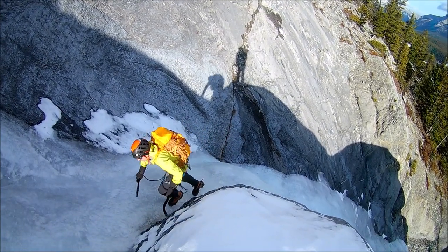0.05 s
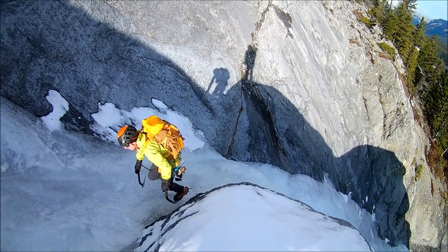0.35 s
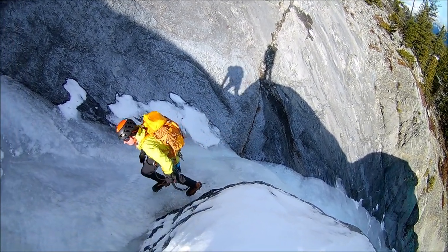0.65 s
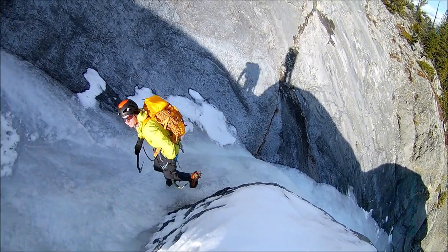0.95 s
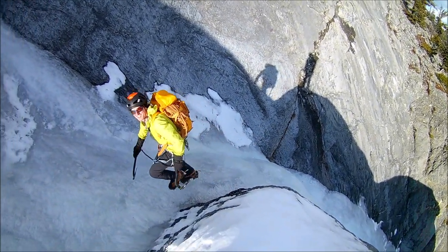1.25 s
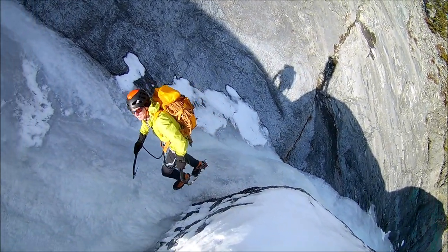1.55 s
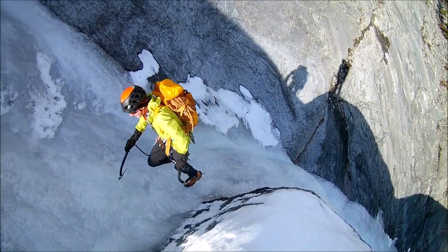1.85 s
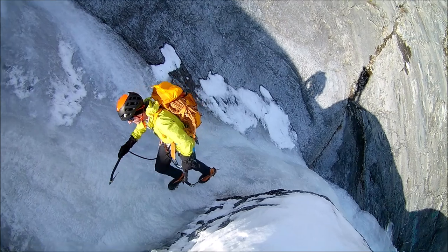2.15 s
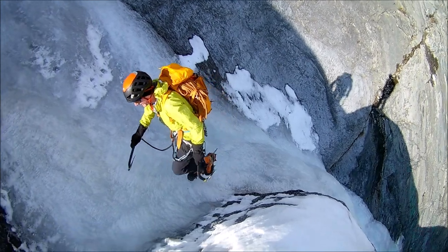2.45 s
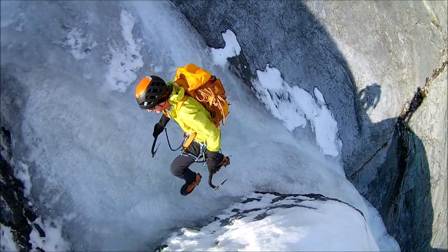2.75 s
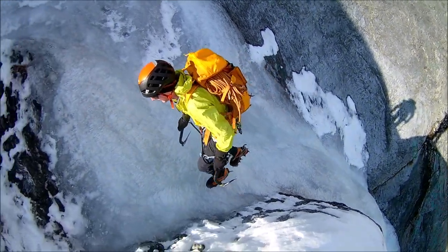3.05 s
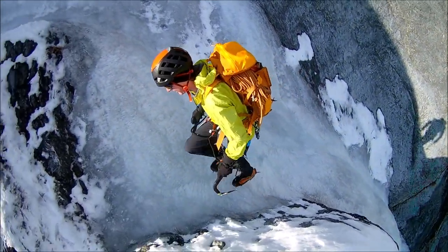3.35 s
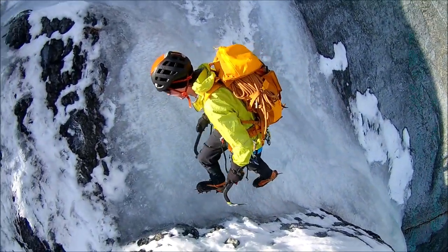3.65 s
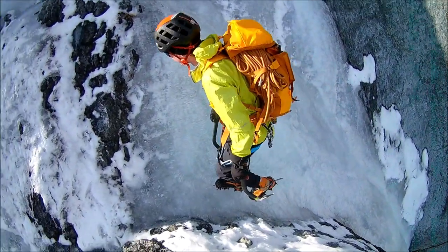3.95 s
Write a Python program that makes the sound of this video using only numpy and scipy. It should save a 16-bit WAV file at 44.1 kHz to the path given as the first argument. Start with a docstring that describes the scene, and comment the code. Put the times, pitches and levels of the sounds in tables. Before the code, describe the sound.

Steel bites into hard ice six times, with light gear clinks, wind and a low hum.

```python
"""Steel bites into hard ice: a few metres away, a climber's tool and crampon points crush in and thud.
Between the blows the steel knocks, gear ticks and clinks, and ice crumbs trickle away.
The crunch is a run of tiny random fractures; the steel is two damped modes jostled by the breaking ice.
Wind rumbles under it all, with a low, beating machine hum and its thin whine."""
import sys
import numpy as np
from scipy import signal
from scipy.fft import rfft, irfft, next_fast_len
from scipy.io import wavfile
from scipy.ndimage import map_coordinates

SR = 44100
rng = np.random.default_rng(int(sys.argv[2]) if len(sys.argv) > 2 else 0)


def persist_wave(psi):
    """Save psi, clipped to +-1, as 16-bit WAV."""
    counts = np.round(np.clip(psi, -1, 1) * 32767).astype(np.int16)
    wavfile.write(sys.argv[1], SR, np.atleast_2d(counts).T)


N = 176400

ATTACK_S, FRACTURES_PER_S = 0.0014, 3000
# The colour of crushing ice. Each row: frequency in Hz, gain in dB.
CRUNCH_COLOUR = [(60, -9.5), (170, 3.5), (400, 4.5), (600, -0.5), (800, 1.5), (1550, 0.5), (1950, -17.5),
                 (2550, -18.5), (3400, -24.5), (7200, -36), (7900, -59), (8900, -38), (11000, -52),
                 (14000, -67)]
# The treble roll-off of the ringing steel. Each row: frequency in Hz, gain in dB.
STEEL_TREBLE = [(1600, 0.5), (1800, -11.5), (2050, -4), (4000, -23.5)]
# The treble roll-off of ticks and clinks. Each row: frequency in Hz, gain in dB.
TICK_TREBLE = [(6800, -1.5), (7900, -25), (9500, -4), (13000, -32)]


def amp(db):
    """Decibels to gain."""
    return 10 ** (np.asarray(db) / 20)


def unit(x):
    """Scale to rms 1."""
    return x / np.sqrt(np.mean(x ** 2) + 1e-20)


def clock():
    """Time of each sample."""
    return np.arange(N) / SR


def level(rows):
    """Gain per sample from (s, dB) points."""
    return amp(np.interp(clock(), *np.transpose(rows)))


def wobble(rate):
    """A smooth random curve, rate knots a second."""
    return map_coordinates(rng.standard_normal(int(N * rate / SR) + 4), [clock() * rate])


def colour(x, points):
    """Minimum-phase EQ through points of frequency in Hz and gain in dB."""
    size = 2 * next_fast_len(len(x))
    hz, db = np.transpose(points)
    curve_db = np.interp(np.log(np.fft.rfftfreq(size, 1 / SR) + 1), np.log(hz), db)
    cepstrum = irfft(np.log(amp(curve_db)))
    cepstrum[1:size // 2] *= 2  # folded, so nothing rings ahead of a hit
    cepstrum[size // 2 + 1:] = 0
    return irfft(rfft(x, size) * np.exp(rfft(cepstrum)), size)[:len(x)]


def envelope(t, attack, hold, t60):
    """Rise over attack, stay up until hold, then fall 60 dB every t60; all in seconds."""
    return np.clip(t / attack, 0, 1) * amp(-60 * np.maximum(t - hold, 0) / t60)


def add(track, s, sound):
    """Mix a sound in at time s."""
    i = round(s * SR)
    part = sound[max(-i, 0):N - i]
    track[max(i, 0):][:len(part)] += part


def fractures(size):
    """Random tiny snaps of uneven strength."""
    return unit(rng.standard_normal(size) * (rng.random(size) < FRACTURES_PER_S / SR))


def burst(shape, points):
    """A run of fractures under an envelope, ringing with a colour."""
    snaps = fractures(len(shape))
    return colour(snaps * shape, points) / np.std(colour(snaps, points))


def ring(t, hz, rough, jostle_cycles=0.65):
    """A resonance whose phase is jostled every cycle or so, as by breaking ice."""
    drift = np.cumsum(rng.standard_normal(len(t) // 3)) * np.sqrt(jostle_cycles)
    jostle = map_coordinates(drift, [t * hz / jostle_cycles])
    return np.sin(2 * np.pi * hz * t + rough * jostle)


def steel(t, hz):
    """A steel point held in ice: its main mode and a quieter, lower one."""
    return ring(t, hz, rough=0.5) + amp(-8) * ring(t, 0.674 * hz, rough=0.5)


def strikes():
    """The point bites, the ice cracks hollow, the steel crushes in ringing and stops with a thud."""
    # Blows into the ice. Each row: start in seconds, crunch in dB, crushing time in seconds, bite in dB,
    # thud pitch in Hz, thud in dB, lower thud in dB, ring pitch in Hz, ring in dB, hollow crack in dB.
    blows = [(0.0, -31.5, 0.0067, -52, 284, -32.5, -33, 1370, -32, -53),
             (0.6535, -31, 0.0055, -52.5, 735, -21.5, -49, 1445, -30.5, -40),
             (1.379, -37.5, 0.015, -45.5, 764, -36, -32, 1527, -38, -40),
             (2.072, -32.5, 0.011, -43.5, 195, -24.5, -29, 1286, -35.5, -46),
             (2.7642, -26, 0.009, -44.5, 325, -18.5, -26, 1530, -28, -43),
             (3.549, -24, 0.0088, -38, 356, -26, -23, 1464, -14.5, -30.5)]
    # The bright chipping of the surface. Each row: frequency in Hz, gain in dB.
    bite_colour = [(300, -62), (1500, 15), (2000, 4.5), (2500, 13), (3300, 2), (4050, 4), (4900, -2.5),
                   (6000, -0.5), (7300, -10.5), (7900, -23), (9000, -10), (11500, -19), (14000, -35)]
    # The hollow crack of the ice. Each row: frequency in Hz, gain in dB.
    hollow_colour = [(1700, -27), (2100, -8.5), (2400, 2.5), (2600, -0.5), (2900, 0.5), (3350, -19),
                     (4050, -11), (4900, -25.5), (5950, -14.5), (6500, -26.5), (9000, -59.5)]
    ice, metal, t = np.zeros(N), np.zeros(N), np.arange(SR // 6) / SR
    for s, db, crush_s, bite_db, thud_hz, thud_db, low_db, ring_hz, ring_db, hollow_db in blows:
        rise = crush_s / 2
        thud = amp(thud_db) * ring(t, thud_hz, rough=0.3)
        thud += amp(low_db) * ring(t, 0.48 * thud_hz, rough=0.3)
        bite = burst(envelope(t, attack=0.0063, hold=0.017, t60=0.043), bite_colour)
        crack = burst(envelope(t, ATTACK_S, hold=0.004, t60=0.036), hollow_colour)
        crunch = burst(envelope(t, rise, crush_s, t60=0.047), CRUNCH_COLOUR)
        add(ice, s - 0.0073, amp(bite_db) * bite)  # the point chips the surface before it sinks in
        add(ice, s - 0.001478, amp(hollow_db) * crack)
        add(ice, s, amp(db) * crunch)
        add(ice, s + 0.0025, envelope(t, rise, rise, t60=0.04) * thud)  # the point stops
        add(metal, s, amp(ring_db) * envelope(t, rise, crush_s, t60=0.02) * steel(t, ring_hz))
    return ice + colour(metal, STEEL_TREBLE)


def wall(x):
    """Rock and ice scatter the sound back as a short, diffuse tail."""
    t = np.arange(SR // 2) / SR
    tail = rng.standard_normal(len(t)) * envelope(t, attack=0.021, hold=0.029, t60=0.44)
    return signal.fftconvolve(x, tail / np.linalg.norm(tail))[:N]


def wind(buffet_width_s=0.028):
    """A dull rush of air, a gusty rumble and a few deep buffets."""
    # The colours of the three layers of air. Each row: frequency in Hz, gain in dB.
    rush_colour = [(100, -15), (170, -1), (239, -5.5), (405, -6), (548, -11.5), (815, -13.5), (896, -16),
                   (1000, -7.5), (1140, -18), (1700, -25), (2390, -41.5), (5090, -49.5), (7850, -55.5),
                   (15500, -55)]
    rumble_colour = [(12, -8.5), (28, 17.5), (50, -5.5), (85, 16), (150, 16.5), (200, 1), (400, -56.5)]
    buffet_colour = [(12, -21), (30, 5), (55, 0.5), (90, 4), (170, -8), (400, -17.5), (900, -97)]
    # The slow swells of rush and rumble. Each row: time in seconds, level in dB.
    rush_ride = [(0.0, -42), (0.28, -44.5), (1.0, -44.5), (1.87, -44.5), (2.71, -43.5), (4.0, -44.5)]
    rumble_ride = [(0, -48), (1.5, -42.5), (2.4, -46.5), (2.7, -37.5), (3.0, -45.5), (4, -39.5)]
    # Gusts hitting the microphone. Each row: peak time in seconds, level in dB.
    buffets = [(2.62, -40), (2.68, -36), (2.789, -31.5), (2.849, -41.5)]
    rush = unit(colour(rng.standard_normal(N), rush_colour))
    rush *= level(rush_ride) * amp(0.67 * wobble(10.0))
    rumble = unit(colour(rng.standard_normal(N), rumble_colour))
    rumble *= level(rumble_ride) * amp(3.4 * wobble(6.04))
    gusts = sum(amp(db) * np.exp(-((clock() - s) / buffet_width_s) ** 2) for s, db in buffets)
    return rush + rumble + gusts * unit(colour(rng.standard_normal(N), buffet_colour))


def hum(turn_hz=25.35, drift=0.0031, sway_db=1.6, sway_rad=0.3):
    """Low harmonics of a turning machine beat once a turn; two fuzzy lines whine above."""
    # The machine's harmonics. Each row: multiple of the turning rate, level in dB before the ride.
    hum_harmonics = [(2, -47), (3, -40.5), (4, -38.5), (5, -36.5)]
    # The fader ride on those harmonics. Each row: time in seconds, gain in dB.
    hum_ride = [(0, -8.5), (.5, -8.5), (.85, -3.5), (2.3, -3), (3.3, -1), (4, -2)]
    # The narrow bands of the whine. Each row: centre in Hz, width in Hz, level in dB.
    whine_bands = [(507, 5.8, -58), (1019, 24, -56)]
    low, whine, t = np.zeros(N), np.zeros(N), clock()
    turn = 2 * np.pi * np.cumsum(turn_hz * (1 + drift * wobble(3.27))) / SR
    for multiple, db in hum_harmonics:
        gain = amp(db + sway_db * wobble(4.106))
        low += gain * np.cos(multiple * turn + rng.normal(0, 0.94) + sway_rad * wobble(4.65))
    for hz, width, db in whine_bands:
        fuzz = wobble(width) + 1j * wobble(width)  # wanders in both level and phase
        whine += amp(db) * unit(np.real(fuzz * np.exp(2j * np.pi * hz * t)))
    return np.sqrt(2) * low * level(hum_ride) + whine


def crumbs(grains_per_s=320, grain_s=0.004):
    """Loose grains of ice rustle down the slope, each a tiny scrape."""
    # The ebb and flow of the trickle. Each row: time in seconds, level in dB.
    trickle_ride = [(0, -77), (.2, -83), (.6, -93), (.76, -77), (1.0, -85.5), (2.0, -80.5), (2.15, -75),
                    (2.7, -89), (2.85, -72.5), (3.3, -74), (3.65, -70), (4, -77)]
    # The crisp colour of the grains. Each row: frequency in Hz, gain in dB.
    grain_colour = [(500, -14), (1500, -3.5), (2200, 9), (4000, 5.5), (6600, -1), (7900, -16.5), (9500, -7),
                    (13000, -34)]
    t = np.arange(SR // 20) / SR
    landings = rng.exponential(size=N) * (rng.random(N) < grains_per_s / SR)
    decays = signal.fftconvolve(landings, np.exp(-2 * t / grain_s))[:N]
    return level(trickle_ride) * unit(colour(decays * rng.standard_normal(N), grain_colour))


def knocks(scuff_below_db=-28.5):
    """Light contacts: a snap, a short crunch and a damped ring; gentler ones scuff instead of snapping."""
    # Steel touching ice. Each row: start in seconds, ring in dB, ring pitch in Hz, crunch in dB.
    contacts = [(0.047, -32.5, 1384, -32.5), (0.103, -41, 1507, -40.5), (0.895, -42.5, 1470, -58),
                (2.107, -40, 1450, -35), (2.3476, -31, 1710, -31), (2.3732, -29, 1704, -32.5),
                (2.779, -34, 1040, -43), (2.825, -36.5, 1494, -36.5), (2.932, -33, 1367, -39),
                (3.5751, -26.5, 1616, -24), (3.604, -34.5, 1580, -33.5), (3.782, -42.5, 1467, -41),
                (3.793, -37.5, 1466, -41), (3.87, -43, 1450, -41.5)]
    # The treble roll-off of snap and crunch. Each row: frequency in Hz, gain in dB.
    ice_treble = [(3000, -1), (10000, -11)]
    ice, metal, t = np.zeros(N), np.zeros(N), np.arange(SR // 8) / SR
    snap = colour(signal.unit_impulse(len(t)), CRUNCH_COLOUR)
    snap = amp(1.5) * snap / np.abs(snap).max()
    for s, ring_db, hz, crunch_db in contacts:
        softness = np.clip(amp(1.4 * (scuff_below_db - crunch_db)), 1, 5.8)
        rise = softness * ATTACK_S / 2
        crunch = burst(envelope(t, rise, rise, t60=0.032), CRUNCH_COLOUR)
        add(ice, s, amp(crunch_db) * (snap / softness + crunch))
        add(metal, s, amp(ring_db) * envelope(t, rise, rise, t60=0.038) * steel(t, hz))
    return colour(ice, ice_treble) + colour(metal, STEEL_TREBLE)


def ticks(skirt_db_per_octave=22.5):
    """Gear and ice chips make small dry clicks, each with a broad peak around its own pitch."""
    # The clicks. Each row: start in seconds, level in dB, pitch in Hz.
    tick_cues = [(0.107, -52, 2180), (2.0265, -54, 2300), (2.61, -47, 2600), (2.847, -60.5, 5900),
                 (3.008, -53, 4150), (3.25, -58.5, 5500), (3.5752, -35, 2920), (3.683, -62, 5960),
                 (3.694, -55, 6000), (3.761, -54, 3400), (3.945, -43, 2070), (3.964, -47.5, 2480)]
    out, t = np.zeros(N), np.arange(SR // 12) / SR
    octaves = np.arange(-4, 5)
    shape = envelope(t, ATTACK_S / 2, ATTACK_S / 2, t60=0.02)
    for s, db, hz in tick_cues:
        peak = np.column_stack([hz * np.exp2(octaves), -skirt_db_per_octave * np.abs(octaves)])
        add(out, s, amp(db) * burst(shape, peak))
    return colour(out, TICK_TREBLE)


def scrape(peak_s=0.71, width_s=0.26):
    """A soft dragging swell as the climber shifts weight."""
    # The narrow midrange of the drag. Each row: frequency in Hz, gain in dB.
    drag_colour = [(600, -38.5), (1400, 6), (1600, 10.5), (1780, 4.5), (2100, -12), (3300, -30),
                   (3800, -13), (4500, -37.5)]
    swell = np.exp(-((clock() - peak_s) / width_s) ** 2)
    return amp(-58) * swell * unit(colour(fractures(N), drag_colour))


def clinks(t60_s=0.025):
    """Hardware on the harness clinks; each touch snaps and favours the modes near one pitch."""
    # Touches of metal. Each row: start in seconds, level in dB, favoured pitch in Hz,
    # loss away from that pitch in dB per octave.
    touches = [(2.2237, -38, 5830, 5.5), (2.373, -44, 6700, 55)]
    # The modes of the hardware. Each row: frequency in Hz, level in dB.
    gear_modes = [(2150, 2.5), (2750, -2), (5000, -10), (5830, -7.5), (6700, -8.5)]
    out, t = np.zeros(N), np.arange(SR // 12) / SR
    for s, db, main_hz, focus in touches:
        modes = sum(amp(mode_db - focus * abs(np.log2(hz / main_hz))) * ring(t, hz, rough=0.35)
                    for hz, mode_db in gear_modes)
        snap = envelope(t, ATTACK_S / 2, ATTACK_S, t60_s / 2) * fractures(len(t))
        add(out, s, amp(db) * envelope(t, ATTACK_S, ATTACK_S, t60_s) * modes)
        add(out, s, amp(db - 5) * snap)
    return colour(out, TICK_TREBLE)


def scene():
    """The climber and the wall's faint answer over wind and hum, in mono."""
    climber = strikes() + knocks() + ticks() + clinks()
    return (climber + amp(-18) * wall(climber) + crumbs() + scrape() + wind() + hum())[None]


def record(dry):
    """A steep low-pass takes off the air above 15.8 kHz."""
    return signal.sosfilt(signal.ellip(12, 0.1, 80, 15800, fs=SR, output="sos"), dry)


dry = scene()
out = record(dry)
persist_wave(out)
```